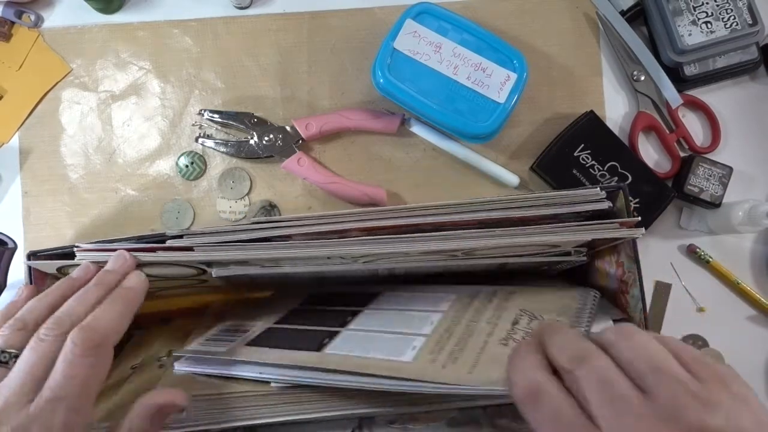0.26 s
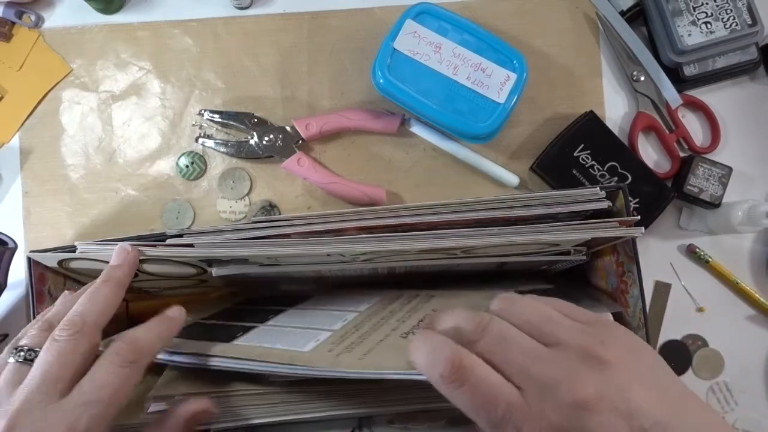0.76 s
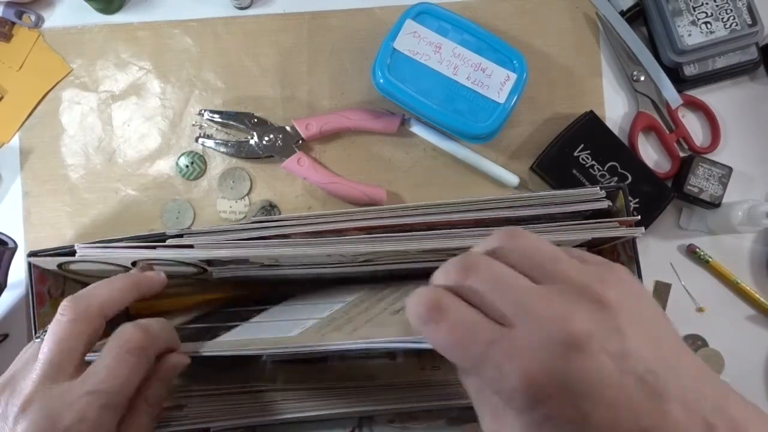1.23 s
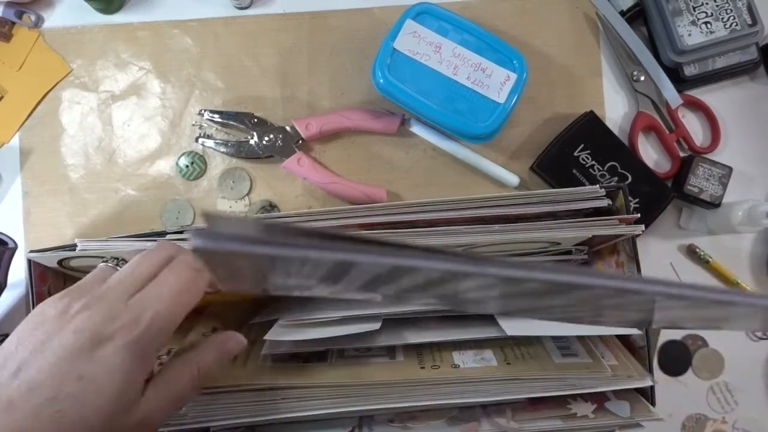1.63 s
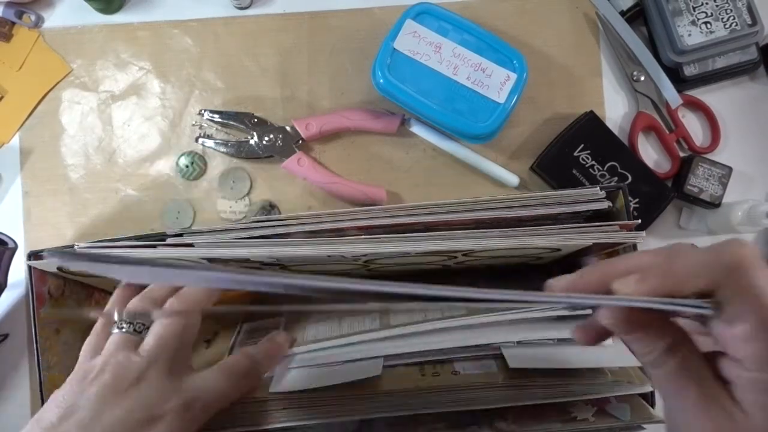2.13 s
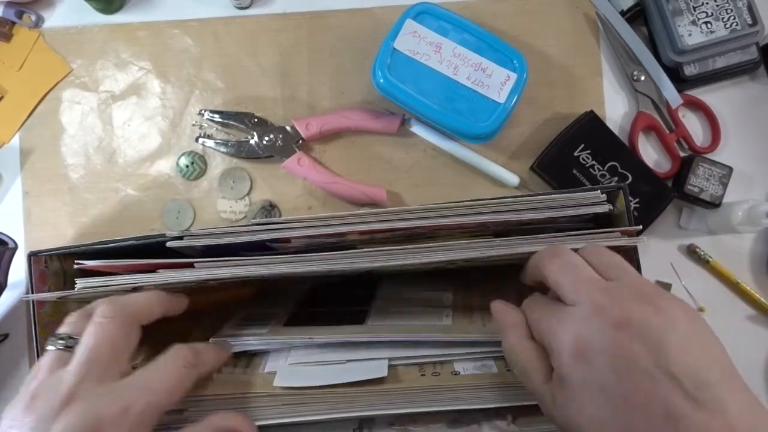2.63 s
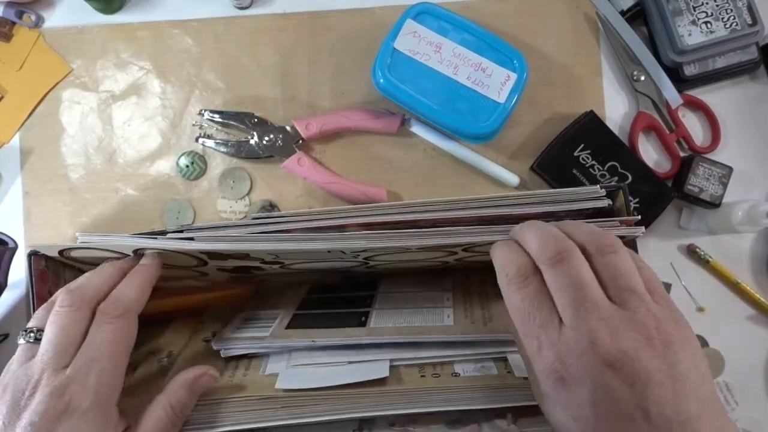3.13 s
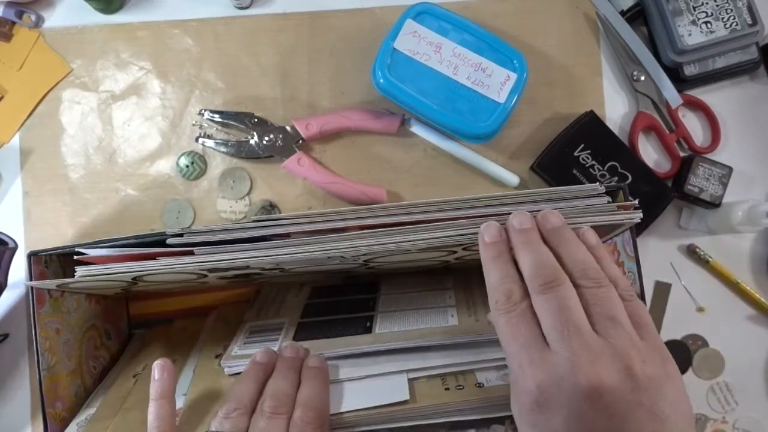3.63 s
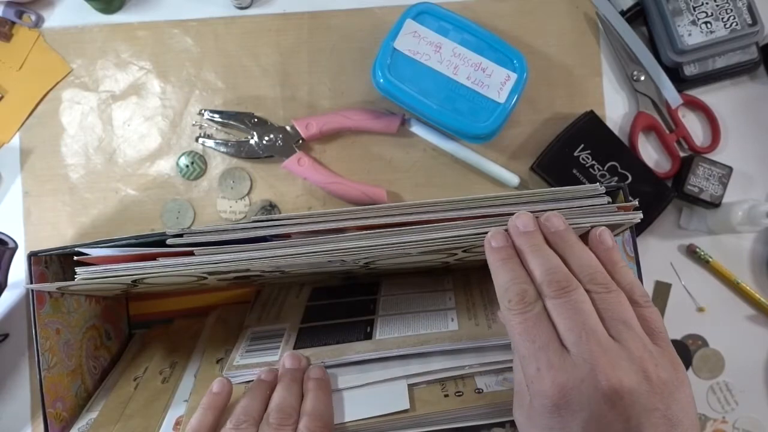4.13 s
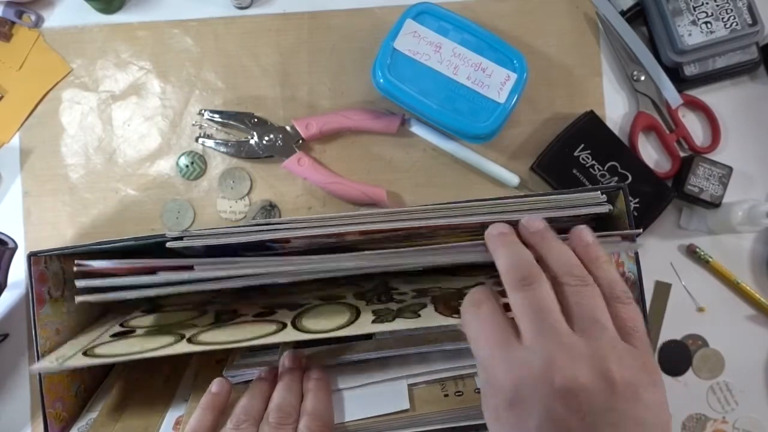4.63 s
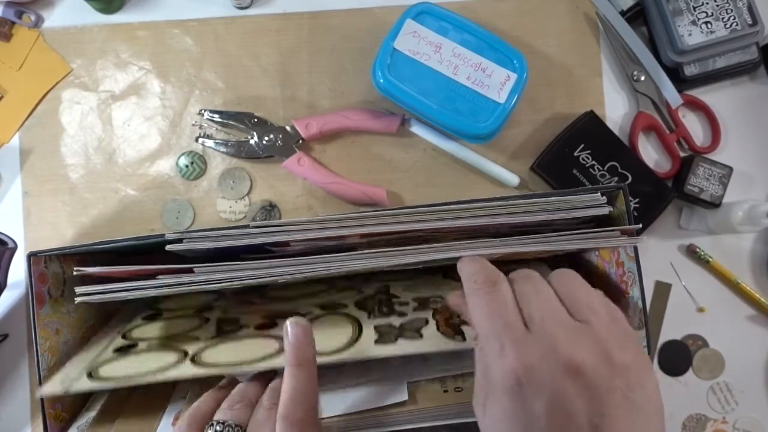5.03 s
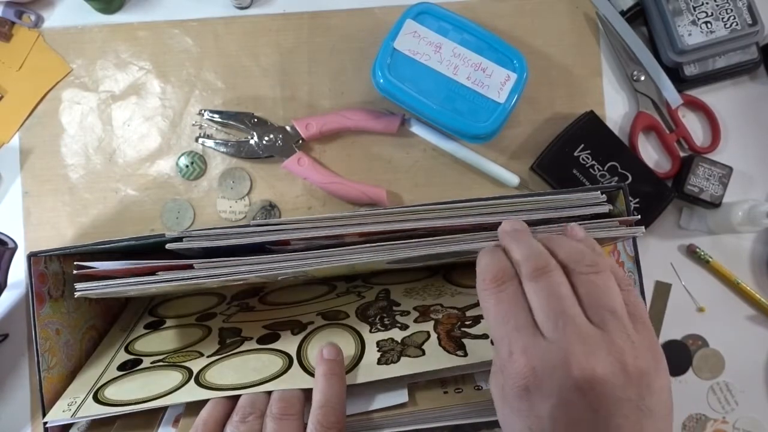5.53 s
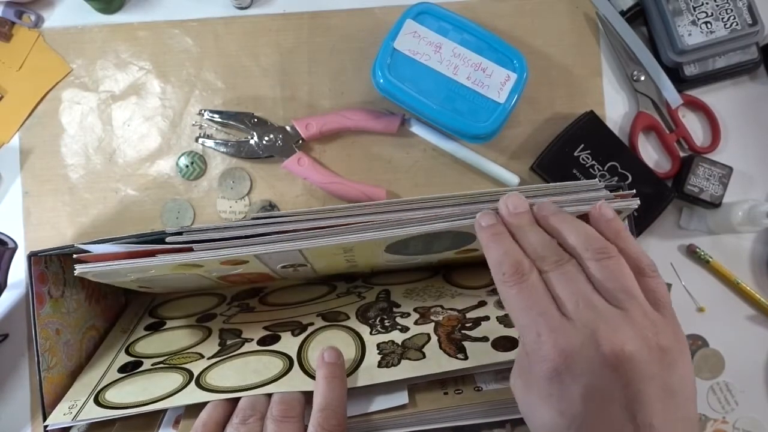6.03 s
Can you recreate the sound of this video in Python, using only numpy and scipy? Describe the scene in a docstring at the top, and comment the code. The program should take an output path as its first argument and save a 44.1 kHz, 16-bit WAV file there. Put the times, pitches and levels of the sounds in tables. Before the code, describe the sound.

Heard close up in a quiet room, stiff paper sheets slide over each other in a card box with hissing swipes and small crisp clicks. The busy opening includes one loud flick. After a short lull, a stack lands with a hollow knock, then the leafing carries on more gently with scattered ticks and taps. Faint room noise and a low motor hum lie underneath.

```python
"""Stiff sticker sheets rustle and click as hands leaf through them in a card box on a table.
Sheets rub and swipe over each other, shaking the box; their edges snap off fingers and neighbours.
Bundles drop and ring the box's modes, and now and then a dragged sheet sings in a narrow band.
Two motors hum under faint room noise; a close pair of microphones looks down on the box."""
import sys
import numpy as np
from scipy import signal
from scipy.fft import rfft, irfft, next_fast_len
from scipy.io import wavfile

SR = 44100
rng = np.random.default_rng(int(sys.argv[2]) if len(sys.argv) > 2 else 0)


def to_wav(s):
    """Save 16-bit WAV."""
    ch = np.atleast_2d(s).T  # columns
    pcm = np.round(np.clip(ch, -1, 1) * 32767)  # PCM
    wavfile.write(sys.argv[1], SR, pcm.astype(np.int16))


N = 276330


def from_db(db):
    """Decibels to gain."""
    return 10 ** (np.asarray(db) / 20)


def unit_rms(x):
    """Scale to rms 1."""
    return x / np.sqrt(np.mean(x ** 2) + 1e-20)


def at_hz(points, hz):
    """Read a table on a log-frequency axis."""
    points_hz, values = np.transpose(points)
    return np.interp(np.log(hz), np.log(points_hz), values)


def drift(rate_hz):
    """Slow random wander, rms 1: noise through two one-pole low-passes."""
    hop, run_in = 40, 2000
    pole = np.exp(-2 * np.pi * rate_hz * hop / SR)
    white = rng.standard_normal(N // hop + run_in + 2)
    slow = signal.lfilter([1], [1, -2 * pole, pole * pole], white)[run_in:]
    return np.interp(np.arange(N) / hop, np.arange(len(slow)), unit_rms(slow))


def ring(force, hz, t60_s):
    """One damped mode: a unit click starts a sine of height 1."""
    r, w = from_db(-60 / (t60_s * SR)), 2 * np.pi * hz / SR
    return signal.lfilter([0, np.sin(w)], [1, -2 * r * np.cos(w), r * r], force + 1e-18)


# Likeness of the room's sound at the two microphones: freq_hz, correlation
STEREO_LIKENESS = [(60, .998), (250, 0.92), (500, 0.37), (1000, 0.22), (2000, 0.24), (4000, 0.14),
                   (8000, 0.07)]


def coloured(white, spectrum, flicker_db, flicker_hz, width, edge_count=12):
    """Stereo noise in bands, each with its own level, flicker and left-right likeness; rms 1."""
    out, common_drift = 0, drift(flicker_hz)
    edges_hz = np.geomspace(spectrum[0][0], spectrum[-1][0], edge_count)
    for k, (low, high) in enumerate(zip(edges_hz, edges_hz[1:])):
        band = signal.butter(2, [low, high], "band", fs=SR, output="sos")
        mid, side = signal.sosfilt(band, white[k % 2])
        hz = np.sqrt(low * high)
        alike = np.clip(1 - width * (1 - at_hz(STEREO_LIKENESS, hz)), -1, 1)
        gain = from_db(at_hz(spectrum, hz) + flicker_db * (0.52 * common_drift + drift(flicker_hz)))
        out = out + gain * (np.sqrt(1 + alike) * mid + np.sqrt(1 - alike) * side * [[1], [-1]])
    return unit_rms(out)


# Slow shifting of the stack: time_s, rubbing_db, rumble_db
STACK_MOTION = [(0, -58, -59), (.3, -57, -62), (.75, -57, -68), (1.0, -60.5, -65.5), (1.46, -60.5, -61.5),
                (1.62, -64, -64.5), (1.95, -67.5, -63), (2.2, -61.5, -61.5), (2.48, -58, -55),
                (2.82, -63, -63), (3.2, -61, -60.5), (3.7, -61, -56.5), (3.82, -64.5, -65),
                (4.15, -65, -63), (4.3, -68, -71.5), (4.8, -60.5, -54), (5.1, -62.5, -64),
                (5.35, -61.5, -57), (5.55, -65.5, -75), (6.0, -66, -65.5), (6.27, -67.5, -75)]


def stack_levels_db():
    """Rubbing level and box rumble level at every sample."""
    time_s, *levels_db = np.transpose(STACK_MOTION)
    return [np.interp(np.arange(N) / SR, time_s, column) for column in levels_db]


def friction(catches_per_s, spread_db):
    """Four streams of tiny catches between two surfaces, at the same moments but each uneven in size."""
    sizes = from_db(spread_db * np.minimum(rng.exponential(1, (2, 2, N)), 5))
    return sizes * rng.standard_normal((2, 2, N)) * (rng.random(N) < catches_per_s / SR)


# One sheet swiped along another: start_s, swell_s, sag_s, rustle_db, hiss_db
SHEET_SWIPES = [(.06, .047, .11, -56.5, -77), (0.157, 0.058, 0.042, -46.5, -42),
                (.225, 0.044, 0.014, -48, -43.5), (.33, 0.18, 0.047, -51.5, -43),
                (0.501, 0.0074, 0.086, -33.5, -31), (.61, 0.068, 0.017, -43, -37.5),
                (0.802, 0.021, 0.074, -46, -47), (1.002, 0.09, 0.028, -50, -48),
                (1.23, 0.061, .014, -43.5, -43.5), (1.283, 0.086, 0.046, -49.5, -35),
                (1.982, 0.062, 0.032, -49.5, -54.5), (2.213, 0.019, 0.012, -53, -55),
                (2.268, .037, 0.047, -50.5, -44.5), (2.342, 0.0087, 0.081, -36.5, -46),
                (2.366, 0.055, 0.013, -49, -38.5), (2.532, 0.04, 0.094, -62, -50.5),
                (2.697, 0.02, 0.081, -59, -55), (2.9, .018, 0.03, -75, -56), (3.07, 0.032, .026, -70, -58),
                (3.25, 0.099, 0.024, -46, -48), (3.476, 0.054, 0.14, -49, -50),
                (3.81, 0.05, 0.066, -66, -59), (4.36, 0.044, 0.016, -56.5, -64),
                (4.612, 0.028, 0.15, -55.5, -55.5), (4.784, 0.014, 0.037, -46, -52),
                (4.84, 0.036, .03, -55, -62), (4.92, .022, 0.0095, -49, -68),
                (4.977, 0.019, 0.11, -53.5, -53.5), (5.16, .13, 0.05, -60.5, -60)]


def swipe_gains(onset_s=0.02, stop_s=0.025, entry_db=-9.5, exit_db=-9):
    """Rustle and hiss gains: each swipe swells, sags and stops short."""
    power, t = np.zeros((2, N)), np.arange(N) / SR
    for start_s, swell_s, sag_s, rustle_db, hiss_db in SHEET_SWIPES:
        corners_s = start_s + np.cumsum([-onset_s, onset_s, swell_s, sag_s, stop_s])
        span = slice(round(corners_s[0] * SR), round(corners_s[-1] * SR))
        shape_db = np.interp(t[span], corners_s, [entry_db - 18, entry_db, 0, exit_db, exit_db - 20])
        power[:, span] += from_db(shape_db + np.array([[rustle_db], [hiss_db]])) ** 2
    return np.sqrt(power)


# Friction spectra of the sheets: freq_hz, relative_density_db
RUSTLE_SPECTRUM = [(500, -23), (900, -1.5), (1300, 1), (2000, 1.5), (3000, -1.5), (4000, -1.5), (6500, -24)]
HISS_SPECTRUM = [(2200, -15), (4000, -1.5), (5500, 0), (7500, 1.5), (10000, -0.5), (12000, -1)]


def sliding_sheets(width=0.78):
    """Rubbing sheets rustle and hiss in clumps; being close, they sound narrower than the room."""
    rubbing_db, _ = stack_levels_db()
    swipe_rustle, swipe_hiss = swipe_gains()
    sparse_catches = friction(catches_per_s=3500, spread_db=0.5)
    rustle = coloured(sparse_catches, RUSTLE_SPECTRUM, flicker_db=1.34, flicker_hz=50, width=width)
    dense_catches = friction(catches_per_s=20000, spread_db=2.5)
    hiss = coloured(dense_catches, HISS_SPECTRUM, flicker_db=2.2, flicker_hz=14, width=width)
    rustle_gain = np.hypot(from_db(rubbing_db), swipe_rustle)
    hiss_gain = np.hypot(from_db(rubbing_db - 1.3), swipe_hiss)
    return rustle_gain * rustle + hiss_gain * hiss


# Modes of the card box: freq_hz, gain_db, t60_s
BOX_MODES = [(130.8, -5, 0.26), (165.5, -20.5, 0.52), (237.4, -8.5, 0.24), (242, -4, 0.043),
             (296.3, 1.5, 0.11), (349.5, -0.5, 0.12), (416.4, 0.5, 0.091), (509.7, -6, 0.17),
             (571.5, -4.5, 0.13), (616, 0.5, 0.068), (714, 1, 0.06), (750, -11.5, 0.09), (938, -8.5, 0.08),
             (1073, -12.5, 0.058), (1214, -12, 0.11), (1470, -58, 0.029), (1617, -7.5, 0.082),
             (1858, -8, 0.053), (2030, -12, .07), (2800, -25, 0.074)]


def box_rumble():
    """The shifting stack shakes the box's modes, neighbours in opposite sign."""
    _, rumble_db = stack_levels_db()
    shake = rng.standard_normal(N) * from_db(1.36 * drift(rate_hz=51))
    ringing = sum((-1) ** k * from_db(gain_db) * ring(shake, hz, t60_s)
                  for k, (hz, gain_db, t60_s) in enumerate(BOX_MODES))
    low_cut = signal.butter(2, 220, "high", fs=SR, output="sos")
    return from_db(rumble_db) * unit_rms(signal.sosfilt(low_cut, ringing))


# Background of the room: freq_hz, relative_density_db
ROOM_SPECTRUM = [(22, -5), (35, -14), (55, 2), (92, -2.5), (168, -6), (320, -6.5), (470, -15.5),
                 (720, -16.5), (1300, -24), (1750, -28), (2400, -48), (3600, -35), (7000, -39),
                 (12000, -93)]


def room_noise(level_db=-56):
    """Faint, mostly low noise that flickers slightly."""
    white = rng.standard_normal((2, 2, N))
    noise = coloured(white, ROOM_SPECTRUM, flicker_db=0.7, flicker_hz=14, width=1, edge_count=20)
    return from_db(level_db) * noise


# Two motors: pitch_hz, rms_db
MOTOR_TONES = [(43.45, -56.5), (40.94, -62.5)]


def motor_hum(in_phase_s=0.47, waver_db=1.2):
    """Two close low tones beat against each other, each wavering a little."""
    t = np.arange(N) / SR - in_phase_s
    return sum(np.sqrt(2) * from_db(rms_db + waver_db * drift(rate_hz=0.55)) * np.cos(2 * np.pi * hz * t)
               for hz, rms_db in MOTOR_TONES)


def faint_snap_rows(count=30, over_rubbing_db=10.5, spread_db=1.5):
    """Extra rows for edge_snaps at random moments; their strength follows the rubbing."""
    when, pitch_place, crack_place = rng.random((count, 3)).T
    peak_scatter, crack_scatter, pan_scatter = rng.standard_normal((count, 3)).T
    rubbing_db, _ = stack_levels_db()
    peak_db = rubbing_db[(when * N).astype(int)] + over_rubbing_db + spread_db * peak_scatter
    crack_db = peak_db - 12.5 + spread_db * crack_scatter
    pitch_hz = 990 * (3500 / 990) ** pitch_place
    crack_hz = 4000 * (7700 / 4000) ** crack_place
    return np.transpose([when * N / SR, peak_db, pitch_hz, crack_db, crack_hz, 5 * pan_scatter])


# Edges snapping free: start_s, peak_db, pitch_hz, crack_rms_db, crack_hz, left_minus_right_db
EDGE_SNAPS = [(.157, -37, 5130, -44.5, 8290, .5), (.185, -28.5, 3100, -42.5, 8200, 0),
              (.2035, -31, 1000, -55, 6000, 1), (.2139, -41, 1700, -36.5, 8730, 1),
              (.2511, -38, 3800, -39, 6750, 1), (.3598, -33.5, 2400, -47, 7810, 0),
              (.4578, -33.5, 1200, -41, 5970, 1), (.4909, -24, 1740, -29.5, 4300, 0),
              (.5032, -15, 1290, -27.5, 5360, -2), (.5092, -12.5, 1330, -27.5, 4000, 2),
              (.5938, -46, 2080, -44, 4970, -5), (.6601, -27, 4960, -28.5, 6650, 2),
              (.7184, -40, 1050, -44, 7040, -1), (.7295, -51, 5120, -45, 5540, 3),
              (.8118, -44, 4770, -45.5, 4770, -2), (.841, -30.5, 3130, -39.5, 5000, -3),
              (.8803, -35, 1800, -59, 4900, -2), (.9773, -35.5, 1470, -52, 4540, 1),
              (1.0023, -38.5, 1380, -49, 4610, .5), (1.0989, -30.5, 1380, -42, 6400, 0),
              (1.282, -29, 1260, -38.5, 6360, -2), (1.3806, -33, 4930, -48, 6640, -3),
              (1.4012, -31, 4000, -42.5, 6950, -4), (1.5563, -40.5, 1210, -49, 4470, 2),
              (1.5872, -46, 1450, -58, 6360, -5), (1.7318, -52, 930, -61, 5470, 3),
              (1.988, -38, 970, -54, 6230, -2), (2.0509, -31.5, 1640, -39.5, 7550, 0),
              (2.0842, -42, 1650, -45, 7840, 0), (2.1236, -44, 3370, -46, 7860, 4),
              (2.2318, -29, 2200, -49, 4000, 1), (2.271, -40.5, 1410, -45.5, 8070, -3),
              (2.3418, -7, 1130, -44.5, 4400, 2.5), (2.4191, -37, 1010, -31.5, 10300, 2),
              (2.5662, -35.5, 1600, -55, 7960, 3), (2.6042, -38, 1730, -64, 4000, -4),
              (2.615, -37, 1660, -49.5, 4610, 2), (2.6978, -54, 930, -51, 9030, 6),
              (2.815, -45, 1700, -53, 4170, 4), (2.8586, -29.5, 2470, -52, 4010, 3),
              (3.0328, -44, 1800, -70, 5200, -4), (3.1692, -36, 1570, -55.5, 4220, -1),
              (3.2321, -40, 1620, -54, 4080, -3), (3.2685, -39, 1750, -52.5, 4130, -4),
              (3.3149, -31.5, 2620, -53, 6930, -2), (3.338, -42, 2300, -46, 5040, -3),
              (3.1994, -48, 1580, -58, 6000, 5), (3.484, -57, 1430, -51, 7320, -9),
              (3.5054, -51, 1230, -43, 8400, -4), (3.5573, -42, 2170, -44.5, 7230, -.5),
              (3.6117, -36.5, 988, -41, 5870, -3), (3.6403, -32, 1960, -61, 4790, -.5),
              (3.8059, -44.5, 1500, -52.5, 6520, 0), (3.8334, -40, 3360, -49.5, 9000, -5),
              (3.8584, -35, 4800, -39, 5800, -3.5), (3.9873, -57, 4650, -56.5, 4700, -4),
              (4.0197, -30, 3400, -42, 8150, -5), (4.1046, -38.5, 3830, -62, 4010, 4),
              (4.1287, -46, 3470, -57, 5900, -3), (4.4007, -39.5, 3140, -75, 4330, 3),
              (4.5146, -47, 915, -63, 5060, -7), (4.6107, -39, 1060, -63, 4270, .5),
              (4.6426, -37, 1640, -58, 8120, .5), (4.6942, -41, 1080, -63, 7100, 3),
              (4.7968, -36.5, 1090, -55, 4950, 2), (4.8189, -32.5, 1220, -54, 4170, -1),
              (4.85, -31.5, 4630, -49, 4780, 0), (4.8797, -38, 2040, -45.5, 4900, -1),
              (4.9355, -39.5, 2030, -51.5, 4190, -.5), (4.9703, -41, 1950, -60, 5960, -5),
              (5.005, -34.5, 2800, -50, 4030, -1), (5.1099, -50.5, 1220, -52, 5860, -9),
              (5.3148, -43, 2600, -66, 6100, 5), (5.3287, -34.5, 3850, -61, 3980, 4),
              (5.4786, -44, 1760, -53, 3900, 1), (5.7174, -44.5, 2020, -61, 4000, 4),
              (5.7488, -27, 1810, -40, 3800, 2.5), (6.0128, -39.5, 2010, -69, 5200, 4)]


def edge_snaps(snap_t60_s=0.011, flutter_t60_s=0.053, length=4096):
    """A freed edge sends a burst through the sheet's broad resonance, plus a shorter bright crack."""
    out, t = np.zeros((2, N + length)), np.arange(length) / SR
    crack_low_cut = signal.butter(2, 3000, "high", fs=SR, output="sos")
    rows = np.vstack([EDGE_SNAPS, faint_snap_rows()])
    noises = rng.standard_normal((len(rows), 4, length))
    fade = from_db(-60 * t / snap_t60_s)
    flutter = from_db(-12.5 - 60 * t / flutter_t60_s)   # the sheet flutters on faintly
    for (start_s, peak_db, pitch_hz, crack_db, crack_hz, pan_db), noise in zip(rows, noises):
        body_noise, crack_noise, left_noise, right_noise = noise
        body = ring(body_noise * (fade + flutter), pitch_hz, t60_s=3.3 / pitch_hz)
        body = ring(body, pitch_hz, t60_s=0.5 / pitch_hz)
        stereo_noise = crack_noise + 0.45 * np.array([left_noise, right_noise])
        burst = stereo_noise * (fade ** 2.8 + flutter)
        crack = signal.sosfilt(crack_low_cut, ring(burst, crack_hz, t60_s=2.2 / crack_hz))
        crack_rms = np.std(crack[:, :SR * 6 // 1000])   # first 6 ms
        snap = from_db(peak_db) * body / abs(body).max() + from_db(crack_db) * crack / crack_rms
        start = round(start_s * SR)
        out[:, start:start + length] += snap * from_db([[pan_db / 2], [-pan_db / 2]])
    low_cut = signal.butter(2, 450, "high", fs=SR, output="sos")   # the snaps keep out of the bass
    return signal.sosfilt(low_cut, out[:, :N])


def room_echo(source, t60_s=0.28, wall_cut_hz=3200, apart_hz=1500, bass_cut_hz=277):
    """Six feedback delays a side, duller on every round; close microphones hear the same lows."""
    size = next_fast_len(N + SR)
    hz = np.arange(size // 2 + 1) * SR / size
    wall = 1 / (1 + 1j * hz / wall_cut_hz)
    response = np.zeros((2, len(hz)), complex)
    for k, lag_s in enumerate(rng.uniform(0.008, 0.03, 12)):
        loop = from_db(-60 * lag_s / t60_s) * wall * np.exp(-2j * np.pi * hz * lag_s)
        response[k % 2] += loop / (1 - loop) * (-1) ** (k // 2)
    mid = response.mean(axis=0)
    response = mid + (response - mid) * hz / (hz + apart_hz)
    response *= hz ** 2 / (hz ** 2 + bass_cut_hz ** 2)
    return irfft(response * rfft(source, size), size)[:, :N]


# Bundles landing in the box: start_s, peak_db, favoured_hz, t60_share (left by the damping hand)
BUNDLE_LANDINGS = [(.481, -30.5, 400, 0.44), (.506, -26.5, 600, .6), (.511, -23, 288, 0.44),
                   (1.278, -45, 401, .98), (2.053, -39.5, 350, 0.73), (2.344, -6.5, 805, 0.68),
                   (2.348, -12, 200, 0.38), (2.355, -6.5, 366, 0.62), (2.364, -8.5, 366, .7),
                   (2.378, -16, 700, 0.48), (2.432, -33, 130, .4), (2.55, -36, 327, .4),
                   (3.319, -37, 335, 0.37), (3.339, -37, 294, 0.62), (3.505, -36.5, 387, 1.),
                   (3.558, -26.5, 305, 0.39), (4.799, -49, 748, 0.76), (4.851, -35, 240, 0.15),
                   (4.972, -36, 345, 1.), (5.747, -34.5, 530, 0.37)]


def box_knocks(contact_hz=980, bass_cut_hz=95, spread_db=1.5, favour_db_per_octave=6.5):
    """A soft landing is a low-passed click; where it lands favours some box modes over others."""
    length = SR // 2
    out = np.zeros(N + length)
    scatters_db = spread_db * rng.standard_normal((len(BUNDLE_LANDINGS), len(BOX_MODES)))
    push = signal.lfilter(*signal.butter(2, contact_hz, fs=SR), signal.unit_impulse(length))
    # The knocks carry no deep bass.
    push = signal.lfilter(*signal.butter(2, bass_cut_hz, "high", fs=SR), push)
    for (start_s, peak_db, favoured_hz, t60_share), scatter_db in zip(BUNDLE_LANDINGS, scatters_db):
        knock = np.zeros(length)
        for k, (hz, gain_db, t60_s) in enumerate(BOX_MODES):
            mode_db = gain_db + scatter_db[k] - favour_db_per_octave * abs(np.log2(hz / favoured_hz))
            knock += (-1) ** k * from_db(mode_db) * ring(push, hz, t60_s * t60_share)
        start = round(start_s * SR)
        out[start:start + length] += from_db(peak_db) * knock / abs(knock).max()
    return out[:N]


# Drags that make a sheet sing: start_s, length_s, level_db, first_hz, last_hz
SINGING_DRAGS = [(.56, 0.09, -47.5, 1350, 1370), (1.0, .13, -53.5, 1363, 1386),
                 (3.18, .37, -59, 1540, 1533), (4.76, 0.11, -60, 1200, 1255)]


def singing_sheet(half_width_hz=110, ends_db=-10):
    """Friction noise in one gliding resonance: a slow random envelope on the centre frequency."""
    out, t = np.zeros(N), np.arange(N) / SR
    smooth = signal.butter(2, half_width_hz, fs=SR)
    in_phase, quadrature = signal.lfilter(*smooth, rng.standard_normal((2, N)))
    envelope = unit_rms(in_phase) + 1j * unit_rms(quadrature)
    for start_s, length_s, level_db, first_hz, last_hz in SINGING_DRAGS:
        span = slice(round(start_s * SR), round((start_s + length_s) * SR))
        progress = (t[span] - start_s) / length_s
        pitch_hz = first_hz + (last_hz - first_hz) * progress
        tone = (envelope[span] * np.exp(2j * np.pi * np.cumsum(pitch_hz) / SR)).real
        out[span] += from_db(level_db + ends_db * (2 * progress - 1) ** 2) * tone
    return out


def scene():
    """Sheets and box close by, the echo of snaps and knocks, room noise and hum."""
    hits = edge_snaps() + box_knocks()
    background = room_noise()
    rubbing = sliding_sheets() + box_rumble() + singing_sheet()
    echo = from_db(-10) * room_echo(hits.mean(axis=0))
    return hits + rubbing + echo + background + motor_hum()


def record(dry):
    """Two steep low-passes cut the treble above about 11 kHz."""
    edge = signal.cheby2(16, 32, 11300, fs=SR, output="sos")
    skirt = signal.butter(14, 11650, fs=SR, output="sos")
    return signal.sosfilt(skirt, signal.sosfilt(edge, dry))


dry = scene()
out = record(dry)
to_wav(out)
```